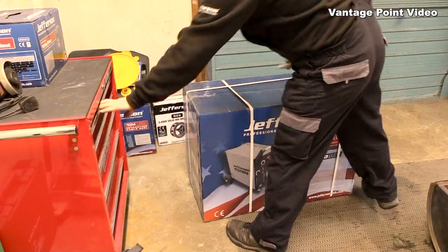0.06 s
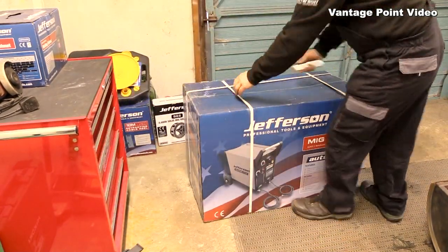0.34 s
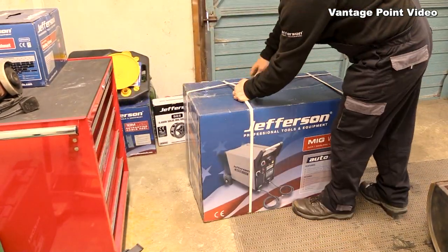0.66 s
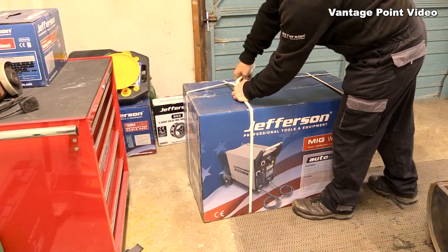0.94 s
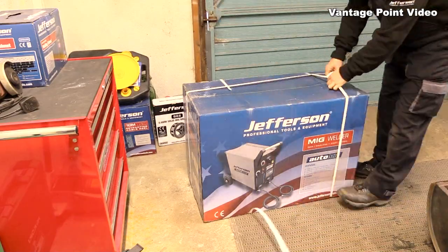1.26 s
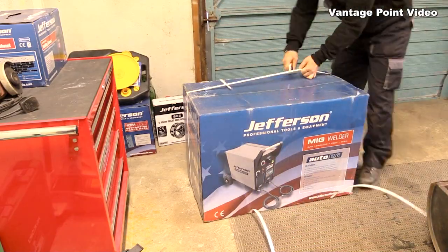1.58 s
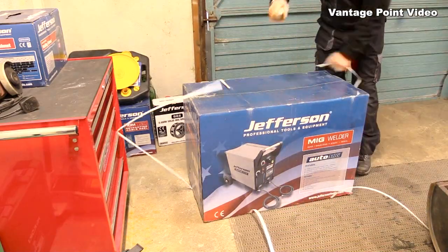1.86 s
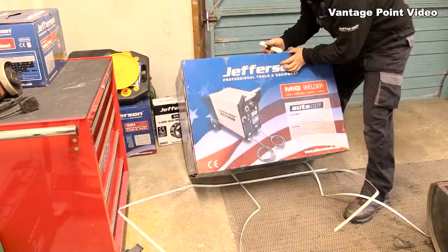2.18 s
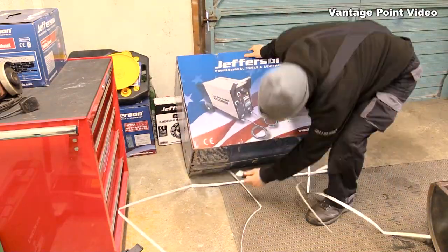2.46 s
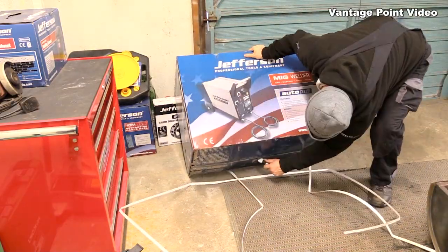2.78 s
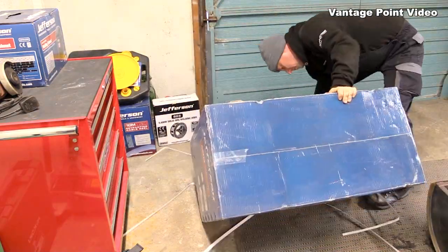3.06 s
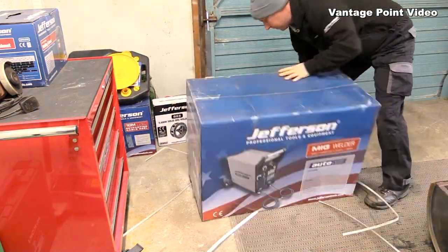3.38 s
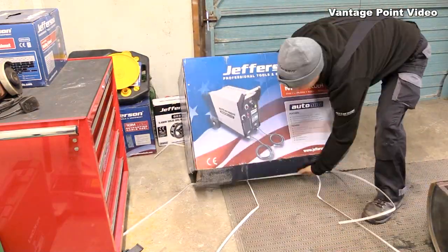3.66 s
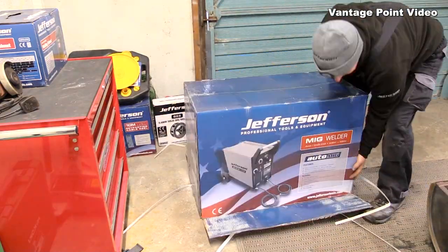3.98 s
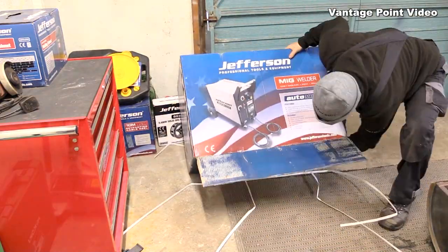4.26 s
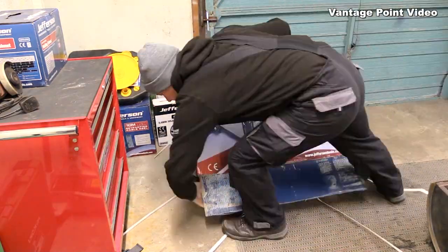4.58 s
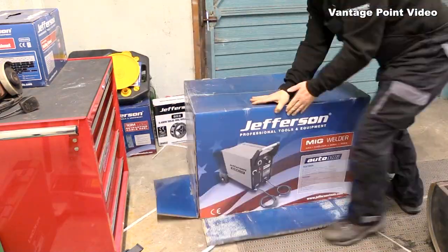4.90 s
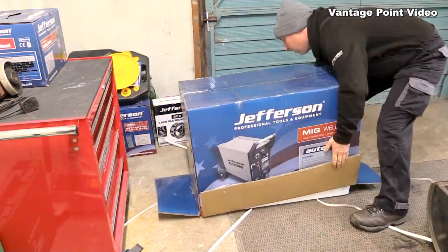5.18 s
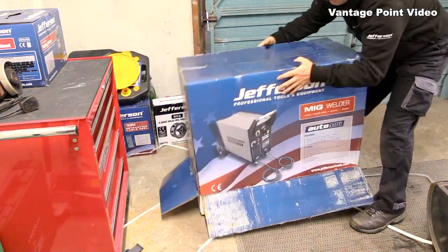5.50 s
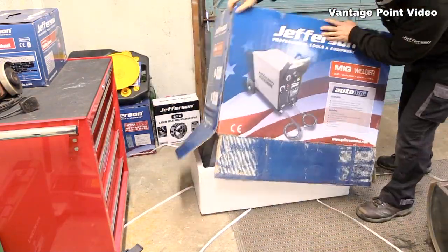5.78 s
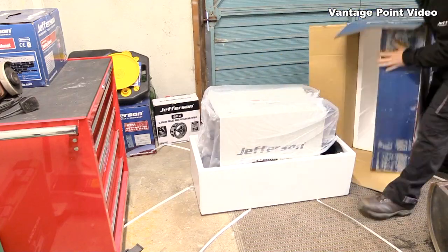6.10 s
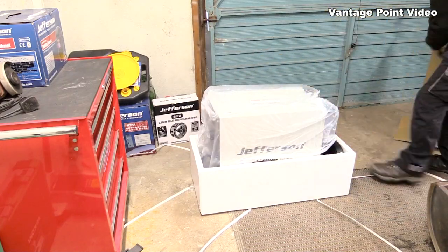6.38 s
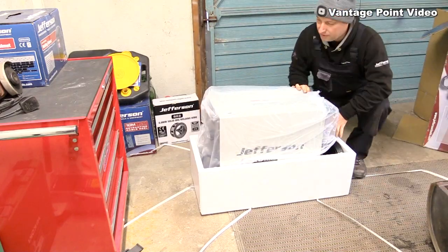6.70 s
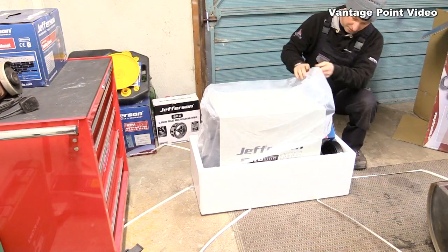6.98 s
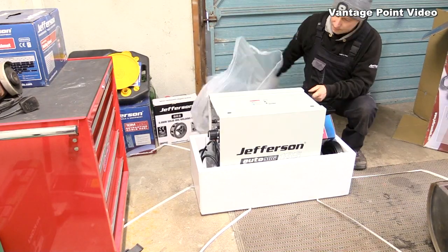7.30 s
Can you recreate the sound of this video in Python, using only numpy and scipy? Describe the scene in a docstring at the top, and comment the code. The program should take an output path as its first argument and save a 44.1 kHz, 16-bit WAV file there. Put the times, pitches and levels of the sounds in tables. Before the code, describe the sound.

Sped-up unpacking in a workshop: whipping straps, hollow cardboard thumps and scrapes, a brief screech, then a crinkling plastic bag.

```python
"""Unpacking a large carton

On a concrete workshop floor, at time-lapse pace, sounds are short and often stop dead. Plastic straps
are cut and whipped away; the carton is tipped, knocked and dragged, and its walls thump and groan as
it slides off its foam tray; a thin plastic bag is pulled off the machine inside. Impacts and stick-slip
friction excite the damped modes of walls, straps and a hard edge, while the film crinkles by buckling."""
import sys
import numpy as np
from scipy import signal
from scipy.fft import rfft, irfft, next_fast_len
from scipy.io import wavfile
from scipy.ndimage import uniform_filter1d, minimum_filter1d

SR = 44100
rng = np.random.default_rng(int(sys.argv[2]) if len(sys.argv) > 2 else 0)


def to_wav(s):
    """Save 16-bit WAV."""
    ch = np.atleast_2d(s).T  # columns
    pcm = np.round(np.clip(ch, -1, 1) * 32767)  # PCM
    wavfile.write(sys.argv[1], SR, pcm.astype(np.int16))


N = 328104
TIME = np.arange(N) / SR
FFT_SIZE = next_fast_len(N)
FREQS = np.maximum(np.arange(FFT_SIZE // 2 + 1) * SR / FFT_SIZE, 1)
BLOW_RISE_S = 0.00226

# Each level_db is relative within its source; boom_db (bass) and hiss_db (treble) are offsets from it.
# Sharp blows on the carton: start_s, fall_s, level_db, boom_db, hiss_db
BLOWS = [(0.401, 0.039, -21, 3.5, -10.5), (2.056, 0.069, -23.5, -14, -7.5), (2.119, 0.063, -12, -13, -11.5),
         (2.233, 0.0031, -35, -14, 11), (2.427, 0.075, -33.5, -1.5, -3.5), (2.466, 0.024, -29, -4, 3),
         (2.674, 0.099, -27.5, 8, -1), (2.925, 0.048, -12.5, -1, -6.5), (3.015, 0.047, -14.5, -.5, -3.5),
         (3.998, .015, -19.5, -18, 0), (4.713, 0.031, -25.5, 10, -1), (4.805, .024, -15, -1.5, 0.5),
         (4.961, 0.043, -12, -5, -15.5), (5.412, 0.0085, -31, 15, -10), (6.155, 0.057, -31.5, 10, -16)]
# The carton is shoved or a flap bent open: start_s, length_s, level_db, boom_db, hiss_db
SHOVES = [(1.62, .05, -36, 7, -24), (2.298, 0.078, -27, -10, -18), (2.545, 0.03, -24, -1, -5),
          (2.663, 0.24, -12.5, 2.5, -7.5), (2.864, .033, -28, -1, -7), (3.056, 0.025, -20.5, -2, 5),
          (3.108, 0.079, -30.5, -4, -3), (3.515, 0.023, -20.5, 0.5, -4), (4, 0.065, -20, -14, 2),
          (4.124, 0.067, -16.5, -20, -3.5), (4.32, 0.083, -18.5, -2, -2), (4.642, 0.044, -23, 0, -3.5),
          (4.859, 0.13, -19.5, 1, 4.5), (5.847, 0.12, -23.5, -4, 2), (6.069, 0.042, -24.5, 1, 6.5),
          (6.364, 0.074, -20, 5, -4.5), (6.48, 0.069, -22.5, -0.5, -2)]
# The carton sticks and slips almost evenly: start_s, rise_s, fall_s, slips_per_s, level_db, bright_hz
JUDDERS = [(4.0, 0.048, .025, 370, -9, 4150), (4.343, 0.013, 0.053, 143, -15.5, 690)]
# Soft heavy bumps of carton and boots: start_s, level_db, pitch_hz, t60_s
THUMPS = [(2.44, -29, 140, 0.094), (2.875, -22.5, 225, 0.035), (3.417, -29, 210, 0.04),
          (4.231, -29.5, 169, 0.067), (4.354, -16.5, 207, .13), (4.39, -14.5, 221, 0.16),
          (4.514, -29, 140, 0.14), (4.579, -16.5, 150.2, 0.18), (4.606, -15.5, 136, .078),
          (4.633, -12, 165, 0.041), (4.759, -21.5, 220, .1), (4.962, -11, 202, 0.025),
          (5.159, -28.5, 153, 0.085), (5.414, -11, 138, 0.015), (5.556, -13, 207, 0.022),
          (5.71, -16, 240, 0.027), (6.38, -24.5, 167, 0.23), (6.572, -15, 276, 0.019)]
# A rubbed wall or strap catches: start_s, length_s, pitch_hz, level_db
GROANS = [(.401, .028, 480, -20), (1.625, 0.048, 980, -27), (1.626, 0.05, 501, -26),
          (1.67, 0.054, 2200, -38), (1.728, 0.044, 3210, -35.5), (2.718, 0.09, 430, -9),
          (2.925, 0.067, 779, -18.5), (3.018, 0.087, 798, -18), (4.006, 0.024, 1600, -16),
          (4.012, 0.027, 2300, -10.5), (4.016, 0.032, 3290, -19.5), (4.499, 0.071, 1453, -26),
          (4.862, 0.096, 376, -13), (4.985, .042, 899, -17.5), (5.275, 0.019, 565, -16.5),
          (5.305, 0.014, 550, -12.5), (6.185, 0.093, 400, -18.5), (6.197, 0.13, 290.3, -22),
          (6.209, .15, 795, -26.5), (6.27, .05, 520, -18.5), (6.316, 0.02, 365, -12.5),
          (6.65, .04, 425, -21)]
# Brief rubs of hands, boots and cardboard: start_s, contact_s, level_db, boom_db, hiss_db
RUBS = [(0, .04, -44.5, 9, -12), (.06, 0.085, -45.5, 1, -6.5), (0.204, 0.074, -44, -2, -4),
        (.3, 0.038, -42.5, 3.5, -5.5), (.45, 0.028, -44, 3.5, -3.5), (.985, 0.038, -46, -17, 1.5),
        (1.185, 0.03, -53.5, 10.5, 0.5), (1.265, 0.09, -48.5, -4, -9), (1.57, 0.045, -52.5, -1, -4),
        (1.77, 0.096, -47, -4, -29), (2.167, 0.133, -40, -6, 1.5), (2.327, 0.091, -55, -3, -3),
        (2.46, 0.14, -30.5, -7.5, -7.5), (2.785, 0.084, -31.5, -2.5, -3), (2.888, .03, -53, 4, -5),
        (3.084, .04, -46, -1, -3), (3.163, 0.042, -42, 2.5, 1), (3.25, 0.055, -50, -2, 4),
        (3.96, .09, -24, -4, -17), (4.051, .14, -34.5, -10, -3.5), (4.181, 0.055, -32, -0.5, 0.5),
        (4.254, 0.19, -26, -2.5, -7.5), (4.35, 0.064, -22, 0.5, 0.5), (4.46, 0.13, -32, 2, -4.5),
        (4.565, .12, -26.5, 5, -4), (4.72, 0.14, -29.5, 5, -6), (4.81, 0.22, -22.5, -5, -7.5),
        (5.0, .02, -37, -16.5, -14), (5.94, 0.069, -30, -4.5, -2.5), (6.02, 0.09, -29, 2, -2.5),
        (6.151, 0.07, -29, 7, -6.5), (6.22, .22, -34, 7.5, -13), (6.548, 0.083, -35.5, 7, -12)]
# Two drags, the carton walked round and then lifted off its tray: time_s, level_db, boom_db, hiss_db
DRAGS = [
    [(3.4, -32, -13, -10), (3.422, -32.5, -5, 0), (3.47, -28.5, -10, -5.5), (3.528, -21.5, -13, -9),
     (3.608, -39, -10, 1), (3.668, -32, -7, -4.5), (3.75, -37.5, -3.5, -1.5), (3.774, -34, -5, -2),
     (3.876, -32, -2.5, 2.5), (3.9, -30.5, -0.5, -9), (3.99, -24, -22, -2)],
    [(5.07, -42, 5, -12), (5.092, -37, -17.5, -6.5), (5.18, -24, -1, 1.5), (5.212, -22, -11, -5),
     (5.306, -23.5, -7.5, -9), (5.376, -22.5, -14, -8.5), (5.404, -25.5, -4.5, -5.5), (5.674, -24, -6, 7),
     (5.726, -32.5, 8.5, -0.5), (5.79, -47, -4, -2), (5.83, -40.5, -1, -1)],
]
# Straps cut and whipped over the carton: start_s, level_db, hiss_db
STRAP_PULLS = [(0.602, -53, 10.5), (.694, -23, -0.5), (0.822, -49, 12.5), (0.89, -25.5, -0.5),
               (0.95, -37, 2.5), (1.023, -17.5, -3.5), (1.296, -31, -8.5), (1.359, -38, -1.5),
               (1.396, -18.5, -1), (1.512, -48, 5.5), (1.682, -24.5, -17), (1.734, -27.5, -17),
               (1.866, -17, -2)]
# Taut straps ringing: start_s, pitch_hz, level_db
STRAP_PINGS = [(0.825, 3800, -31.5), (.955, 2080, -22.5)]
# A hard edge skids on concrete: start_s, rise_s, fall_s, level_db, boom_db, hiss_db
SKIDS = [(3.285, 0.013, 0.008, -19, -24, 2), (3.307, 0.0099, 0.038, -13.5, -22, 6.5),
         (3.347, 0.016, 0.019, -17.5, -38, 9)]
# The bag is gathered and pulled off: time_s, level_db
BAG_PULL = [(6.68, -37), (6.706, -27.5), (6.826, -38.5), (6.89, -34), (6.938, -21.5), (7.046, -26),
            (7.14, -23), (7.208, -30.5), (7.324, -25.5), (7.44, -35)]
# Moments at which any stroke under way stops dead: time_s
DEAD_STOPS = [2.167, 2.325, 2.784, 2.888, 3.083, 3.133, 4.048, 6.684]

# Modes of the carton's walls: centre_hz, width_hz, gain_db
WALL_MODES = [(140, 17.4, 10.5), (234, 44, 3.5), (297, 41, 2), (425, 20, 2.5), (817, 25, 4.5),
              (1200, 38, 0.5)]
# Modes of the skidding edge: centre_hz, width_hz, gain_db
EDGE_MODES = [(946, 34, -4), (2370, 180, -8), (3450, 53, -8), (3700, 120, -7), (4500, 110, -9),
              (5320, 51, -8), (6100, 57, 4.5), (7300, 70, 4), (8050, 29, -6), (8200, 29, -12),
              (10400, 35, -16), (10800, 43, -7)]
# Spectral envelopes of each kind of contact and of still air: frequency_hz, gain_db
SHOVE_SPECTRUM = [(21, -56), (35, -41), (76, -23), (195, -11.5), (265, -11), (420, -1), (503, -6),
                  (617, 3.5), (955, 1.5), (1230, 4.5), (2730, -3.5), (6040, -9), (11500, -28.5),
                  (14100, -39), (16000, -55)]
SLIDE_SPECTRUM = [(21, -53), (35, -45), (65, -12), (151, -8.5), (180, -4.5), (294, -1), (420, -1.5),
                  (720, -2), (1480, -1.5), (2280, -2.5), (2460, -4.5), (2660, -5), (6040, -8.5),
                  (14400, -32), (16000, -50)]
STRAP_SPECTRUM = [(35, -57), (60, -30), (256, -10.5), (371, -5.5), (579, -1.5), (715, 2.5), (803, 0),
                  (1060, 3), (1200, 2), (2410, -3), (2840, -9.5), (6280, -20), (12700, -38.5), (16000, -52)]
SKID_SPECTRUM = [(120, -67), (200, -39), (394, -29), (548, -27), (916, -6), (1650, -6), (2510, -1.5),
                 (5630, -1), (5940, -4), (11100, -14), (16000, -28)]
BAG_SPECTRUM = [(35, -59), (60, -22), (91, -24), (130, -9), (184, -13.5), (417, -4), (515, -8),
                (1440, -1.5), (5330, -1.5), (7230, -6.5), (13900, -28.5), (14900, -35), (16000, -72)]
AIR_SPECTRUM = [(30, -30), (130, 3), (400, 0), (1500, -8), (6000, -14), (15000, -31)]
# Stereo width from the room's reflections: frequency_hz, side_to_mid_db
SPREAD = [(100, -22), (300, -18), (550, -10), (1200, -7), (4500, -6), (8000, -5), (14000, -33)]


def shoves():
    """Forced vibration: blows and shoves on gritty concrete drive the hollow carton's wall modes."""
    friction = stick_slip(per_s=1800, size_db=3.5, smooth_db=-10.5, clump_db=1.5)
    gestures = [(stroke(start, BLOW_RISE_S, fall), *levels) for start, fall, *levels in BLOWS]
    gestures += [(swell(start, length), *levels) for start, length, *levels in SHOVES]
    spectrum = reflections(friction, t60_s=0.1, echo_db=5) * gain_curve(SHOVE_SPECTRUM) * wall_response()
    return from_db(-3.5) * play(gestures, spectrum)


def knocks():
    """Impulse response: first contacts and judders ring the panels, and the room slaps back."""
    force = judders()
    for start, _, level_db, boom_db, hiss_db in BLOWS:
        strength = from_db(level_db) * np.linalg.norm(from_db([boom_db, 0, hiss_db]))
        pulse = contact_pulse(bright_hz=6000 * 2 ** (hiss_db / 4.5))   # an octave per 4.5 dB of hiss
        at = int((start + BLOW_RISE_S / 2) * SR)
        force[at:at + len(pulse)] += strength * pulse
    direct = irfft(rfft(force, FFT_SIZE) * wall_response(), FFT_SIZE)[:N]
    t = TIME[:SR // 8]
    echoes = rng.standard_normal((2, len(t))) * np.exp(-t / 0.022) * (t > .002)
    slap = rms_one(echoes) / np.sqrt(len(t))
    return direct + from_db(-4.5) * signal.fftconvolve(direct[None], slap, axes=1)[:, :N]


def judders():
    """Relaxation oscillation: the carton sticks and slips, giving a nearly periodic train of forces."""
    force = np.zeros(N)
    waver = 1 + .06 * drift(rate_hz=60)
    sizes = from_db(1.5 * rng.standard_normal(N))
    for start, rise, fall, per_s, level_db, bright_hz in JUDDERS:
        slip_count = np.floor(np.cumsum(per_s * waver) / SR)
        slips = np.diff(slip_count, prepend=0) * sizes * stroke(start, rise, fall)
        force += from_db(level_db) * signal.oaconvolve(slips, contact_pulse(bright_hz))[:N]
    return force


def thumps():
    """Free vibration: a soft blow rings two close wall modes and a weak heave an octave below."""
    out, t = np.zeros(N + SR), TIME[:SR // 2]
    attack = 1 - np.exp(-t / 0.0022)
    for start, level_db, hz, t60 in THUMPS:
        modes = sum(from_db(db) * np.sin(2 * np.pi * hz * ratio * t)
                    for ratio, db in [(0.99, 4), (1.01, 0), (0.5, -25)])
        at = int(start * SR)
        out[at:at + len(t)] += from_db(level_db - 60 * t / t60) * modes * attack
    return out[:N]


def groans(quality_factor=4.2):
    """Friction-fed resonance: slips feed one mode of wall or strap, which holds a fairly even level."""
    out, t = np.zeros((2, N)), TIME[:SR // 2]
    for start, length, hz, level_db in GROANS:
        envelope = swell(start, length)
        on = np.flatnonzero(envelope)[:len(t) * 3 // 4]
        noise = rng.standard_normal((2, len(t))) + 1j * rng.standard_normal((2, len(t)))
        half_band = signal.butter(2, hz / quality_factor / 2, fs=SR, output="sos")
        amplitude = signal.sosfilt(half_band, noise)
        amplitude /= np.sqrt(np.abs(amplitude) + 1e-12)   # evens out the level
        tone = np.real(amplitude * np.exp(2j * np.pi * hz * t))
        mid, side = rms_one(tone)[:, -len(on):]
        width = from_db(np.interp(hz, *np.transpose(SPREAD)))
        out[:, on] += from_db(level_db - 2) * envelope[on] * (mid + width * side * [[1], [-1]])
    return out


def slides(attack_s=0.0079, release_s=0.037):
    """Sliding friction: cardboard on floor, foam and hands drives the walls in rubs and long drags."""
    friction = stick_slip(per_s=1000, size_db=3, smooth_db=-4.5, clump_db=1.77)
    rubs = [(stroke(start, attack_s, release_s, hold_s=max(contact - attack_s, 0)), *levels)
            for start, contact, *levels in RUBS]
    drags = [long_gesture(drag) for drag in DRAGS]
    shuffle = (np.ones(N), -58.5, -4, -4)   # faint steady brushing of clothes and cardboard
    spectrum = reflections(friction, t60_s=0.13, echo_db=1.5) * gain_curve(SLIDE_SPECTRUM)
    return from_db(-0.63) * play(rubs + drags + [shuffle], spectrum * wall_response())


def straps(rise_s=0.014, boom_db=-7):
    """Stick-slip friction: ribbed plastic zips over the carton's edges, and the loose end trails on."""
    friction = stick_slip(per_s=3000, size_db=4.5, smooth_db=-7.5, clump_db=3)
    pulls = []
    for start, level_db, hiss_db in STRAP_PULLS:
        fall_s = 0.03 * 2 ** ((level_db + 18) / 31)   # harder pulls last longer
        loose_end = from_db(-33.5) * stroke(start, rise_s, fall_s=0.071)
        pulls.append((stroke(start, rise_s, fall_s) + loose_end, level_db, boom_db, hiss_db))
    spectrum = reflections(friction, t60_s=0.11, echo_db=5.5) * gain_curve(STRAP_SPECTRUM)
    return from_db(-3) * play(pulls, spectrum)


def skids():
    """Sharp resonance: fast slips on concrete excite a hard edge's lightly damped modes to a screech."""
    friction = stick_slip(per_s=10000, size_db=4.5, smooth_db=1, clump_db=-3.2)
    gestures = [(stroke(start, rise, fall), *levels) for start, rise, fall, *levels in SKIDS]
    modes = sum(from_db(db) * resonance(hz, width) for hz, width, db in EDGE_MODES)
    spectrum = reflections(friction, t60_s=0.13, echo_db=0.5) * gain_curve(SKID_SPECTRUM)
    return from_db(-1.5) * play(gestures, spectrum * (1 + from_db(9.5) * modes))


def bag(boom_db=-12.5, hiss_db=0):
    """Buckling: thin film gives way in a dense crinkle of clicks, with sharper snaps standing out."""
    crinkle = stick_slip(per_s=2000, size_db=4.5, smooth_db=-1.5, clump_db=1.4)
    snaps = from_db(-3) * stick_slip(per_s=120, size_db=2, smooth_db=-30, clump_db=2)
    spectrum = reflections(crinkle + snaps, t60_s=0.087, echo_db=5) * gain_curve(BAG_SPECTRUM)
    return from_db(0.5) * play([(*long_gesture(BAG_PULL), boom_db, hiss_db)], spectrum)


def strap_pings(t60_s=0.052):
    """String vibration: a strap under tension rings briefly on one damped mode."""
    out, t = np.zeros(N), TIME[:SR // 8]
    attack = 1 - np.exp(-t / 0.0019)
    for start, hz, level_db in STRAP_PINGS:
        at = int(start * SR)
        out[at:at + len(t)] += from_db(level_db - 60 * t / t60_s) * np.sin(2 * np.pi * hz * t) * attack
    return out


def room_tone():
    """Ambient noise: the workshop's air is a faint, steady random signal, strongest in the bass."""
    air = reflections(rng.standard_normal(N), t60_s=0.28, echo_db=-20) * gain_curve(AIR_SPECTRUM)
    return from_db(-55.5) * rms_one(irfft(air, FFT_SIZE)[:, :N])


def stick_slip(per_s, size_db, smooth_db, clump_db):
    """Poisson process: sudden releases make clumps of uneven clicks over a smooth rub."""
    released = rng.random(N) < per_s / SR
    sizes = from_db(size_db * np.minimum(rng.exponential(1, N), 4)) * rng.choice([-1, 1], N)
    rub = from_db(smooth_db) * rng.standard_normal(N)
    return (rms_one(released * sizes) + rub) * from_db(clump_db * drift(rate_hz=27))


def contact_pulse(bright_hz):
    """Band-limited impulse of height 1: a harder contact reaches higher frequencies."""
    band = signal.butter(2, [180, min(bright_hz, 15000)], "band", fs=SR, output="sos")
    pulse = signal.sosfilt(band, TIME[:SR // 20] == 0)
    return pulse / np.abs(pulse).max()


def wall_response():
    """Modal filtering: the carton's panels lift a few narrow bands."""
    return np.prod([1 + (from_db(db) - 1) * resonance(hz, width) for hz, width, db in WALL_MODES], axis=0)


def resonance(centre_hz, width_hz):
    """Damped oscillator: the frequency response of one mode, 1 at its peak."""
    return 1 / (1 + 1j * (FREQS ** 2 - centre_hz ** 2) / (FREQS * width_hz))


def reflections(force, t60_s, echo_db):
    """Reverberation: the stereo spectrum of a force smeared by dense, quickly dying echoes."""
    t = TIME[:SR // 4]
    tails = rng.standard_normal((2, len(t))) * from_db(-60 * t / t60_s)
    tails /= np.sqrt(np.sum(tails ** 2, axis=1, keepdims=True))
    tails[0, 0] += from_db(-echo_db)   # the direct path reaches both sides alike
    # Flattened magnitudes keep the colouring light.
    mid, side = [rms_one(np.abs(echo) ** .45) * np.exp(1j * np.angle(echo))
                 for echo in rfft(tails, FFT_SIZE)]
    return rfft(force, FFT_SIZE) * (mid + gain_curve(SPREAD) * side * [[1], [-1]])


def stroke(start_s, rise_s, fall_s, hold_s=0):
    """Force envelope: it builds, holds and eases off, unless a dead stop ends it first."""
    out = np.zeros(N)
    stop_s = min([s for s in DEAD_STOPS if s > start_s], default=np.inf)
    span = slice(int(start_s * SR), int((start_s + rise_s + hold_s + 5 * fall_s) * SR))
    t = TIME[span] - start_s
    ease = np.exp(-(np.maximum(t - rise_s - hold_s, 0) / fall_s) ** 1.5)
    gate = np.clip((stop_s - start_s - t) / .003, 0, 1)
    out[span] = np.clip(t / rise_s, 0, 1) * ease * gate
    return out


def swell(start_s, length_s, rise_share=.28):
    """Gradual loading: the envelope of a push that builds for a set share of its length."""
    return stroke(start_s, rise_share * length_s, (1 - rise_share) * length_s)


def long_gesture(rows):
    """Sustained contact: an envelope from first row to last, then each level interpolated over time."""
    times, *levels = np.transpose(rows)
    contact = np.interp(TIME, [times[0] - .005, times[0], times[-1], times[-1] + .03], [0, 1, 1, 0])
    return [contact] + [np.interp(TIME, times, level) for level in levels]


def split_bands(spectrum, boom_hz=550, hiss_hz=3000):
    """Crossover filtering: wall boom, contact rasp and hiss, each of unit power."""
    low = 1 / (1 + (FREQS / boom_hz) ** 6)
    high = 1 / (1 + (hiss_hz / FREQS) ** 6)
    middle = (1 - low) * (1 - high)
    return [rms_one(irfft(spectrum * share, FFT_SIZE)[:, :N]) for share in (low, middle, high)]


def play(gestures, spectrum):
    """Incoherent summation: gestures (envelope, level_db, boom_db, hiss_db) add in power per band."""
    powers = np.zeros((3, N))
    for envelope, level_db, boom_db, hiss_db in gestures:
        for power, offset_db in zip(powers, (boom_db, 0, hiss_db)):
            power += (from_db(level_db + offset_db) * envelope) ** 2
    return sum(np.sqrt(power) * band for power, band in zip(powers, split_bands(spectrum)))


def drift(rate_hz):
    """Low-pass noise: a smooth random fluctuation of unit power."""
    spectrum = rfft(rng.standard_normal(FFT_SIZE)) / (1 + (FREQS / rate_hz) ** 2)
    return rms_one(irfft(spectrum, FFT_SIZE)[:N])


def gain_curve(points):
    """Spectral envelope: gain at every frequency from (frequency_hz, gain_db) points."""
    hz, db = np.transpose(points)
    return from_db(np.interp(np.log(FREQS), np.log(hz), db))


def from_db(db):
    """Decibels to amplitude ratio."""
    return 10 ** (np.asarray(db) / 20)


def rms_one(x):
    """Normalisation to unit power."""
    return x / np.sqrt(np.mean(x ** 2) + 1e-20)


def scene():
    """Superposition: the handling lies slightly left of centre, over central thumps and the room's air."""
    handling = straps() + strap_pings() + shoves() + knocks() + slides() + skids() + bag() + groans()
    return handling * from_db([[0.27], [-0.27]]) + thumps() + room_tone()


def record(dry, ceiling=.9, window_s=.003, cutoff_hz=15800):
    """Peak limiting and low-pass filtering: the highest peaks are held down and the top is cut."""
    window = int(window_s * SR)
    allowed_gain = ceiling / np.maximum(np.abs(dry).max(axis=0), ceiling)
    gain = uniform_filter1d(minimum_filter1d(allowed_gain, window), window)
    low_pass = signal.ellip(10, .2, 80, cutoff_hz, fs=SR, output="sos")
    return signal.sosfilt(low_pass, gain * dry)


dry = scene()
out = record(dry)
to_wav(out)
```